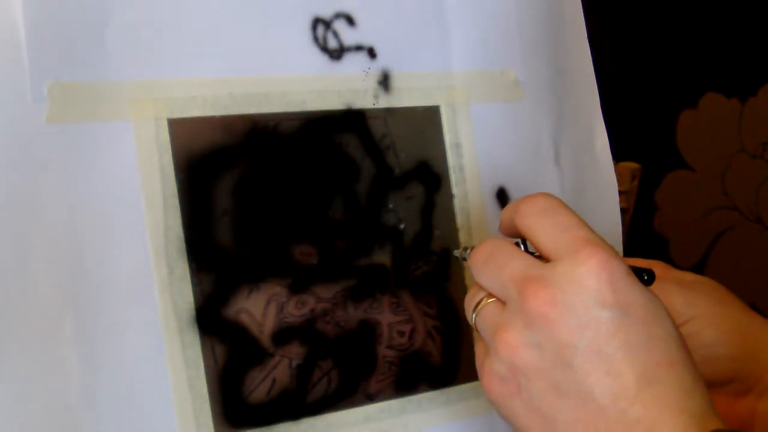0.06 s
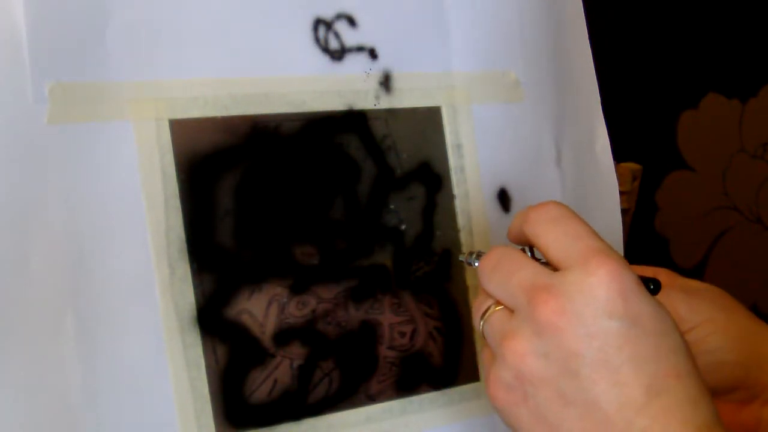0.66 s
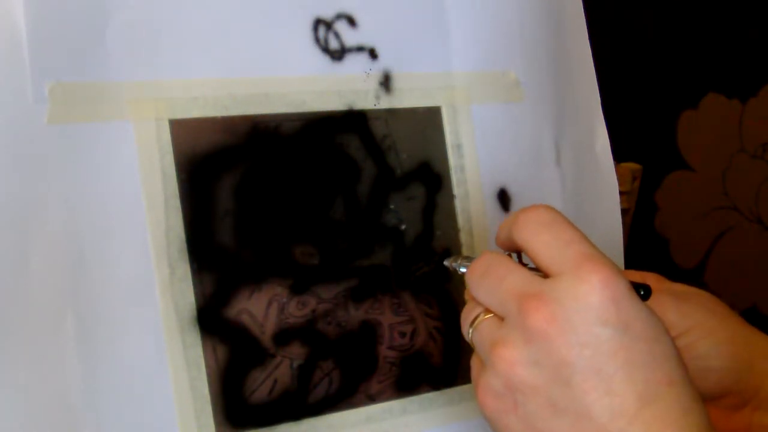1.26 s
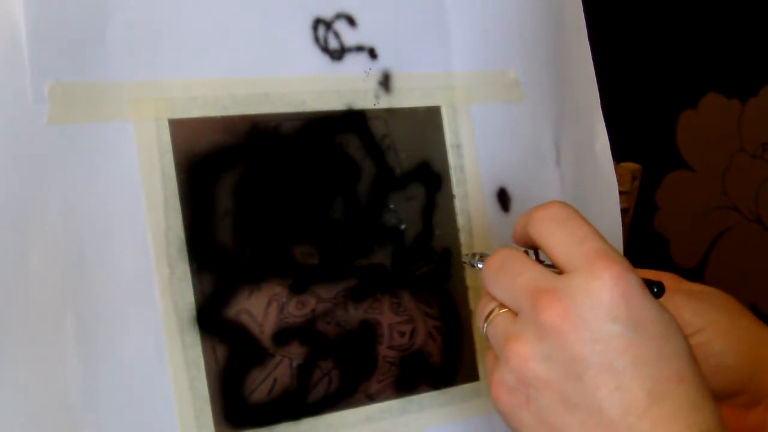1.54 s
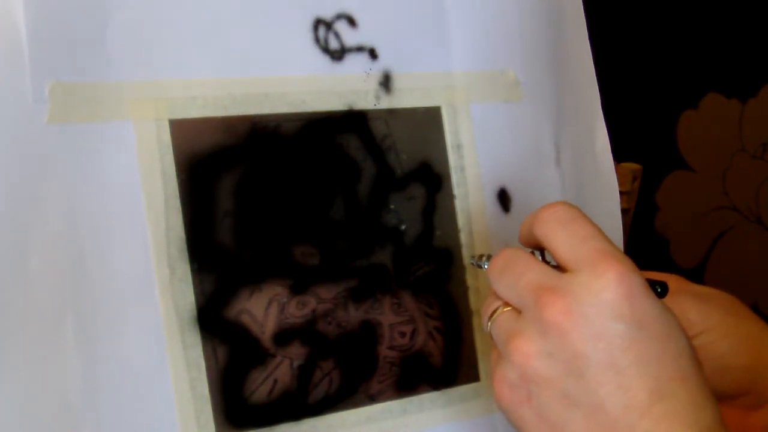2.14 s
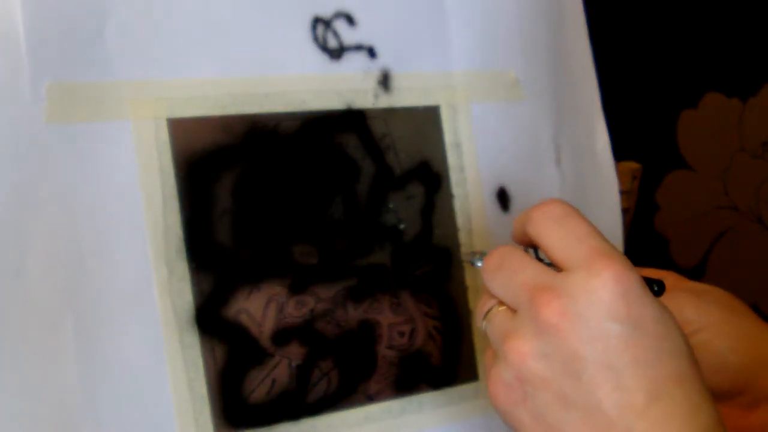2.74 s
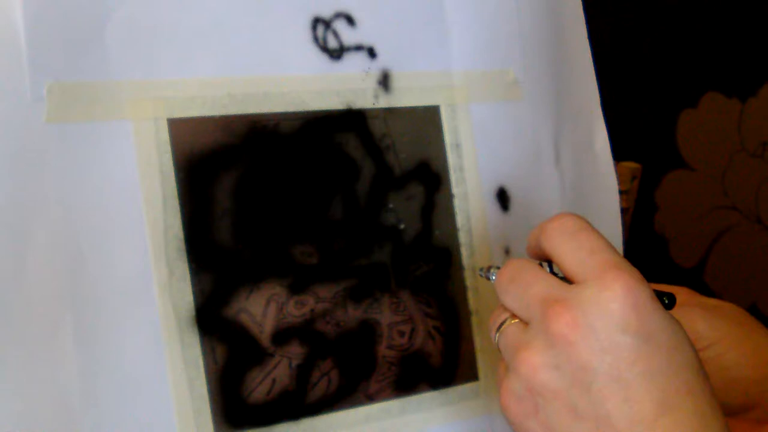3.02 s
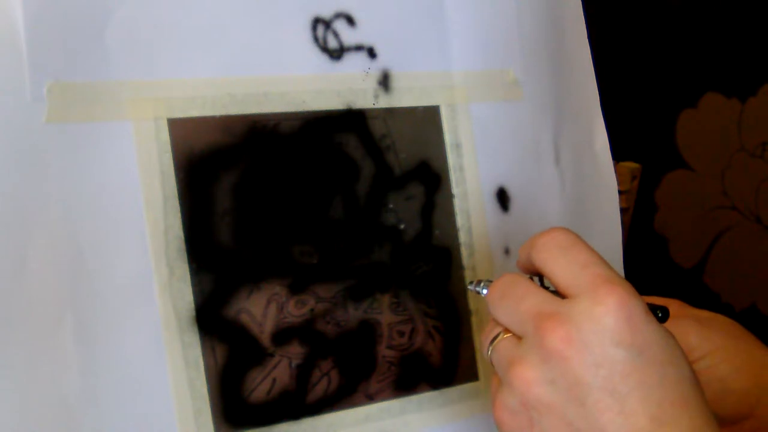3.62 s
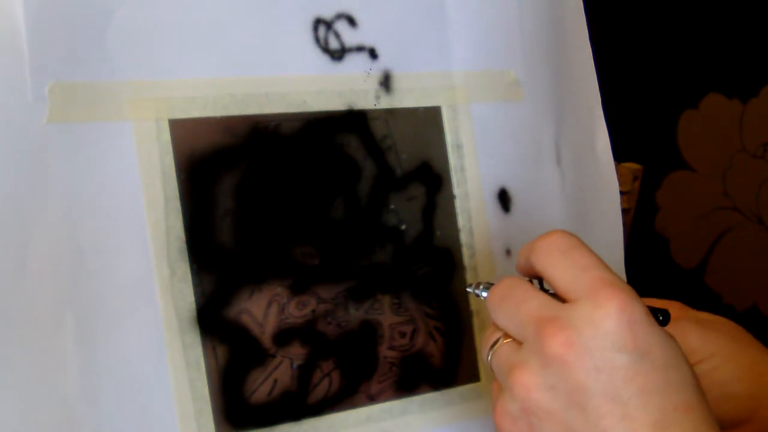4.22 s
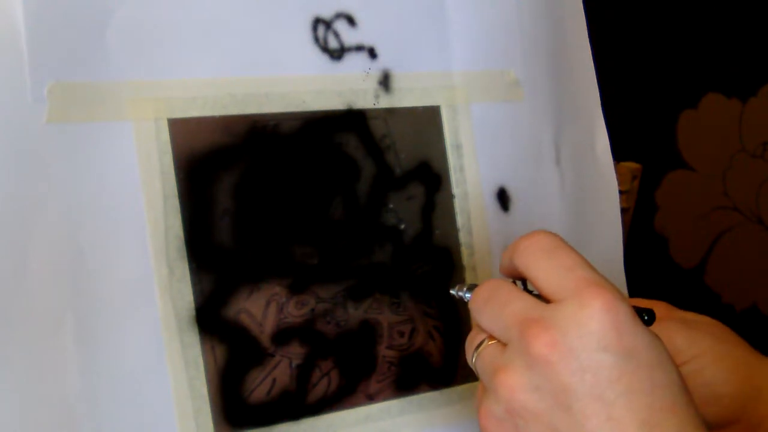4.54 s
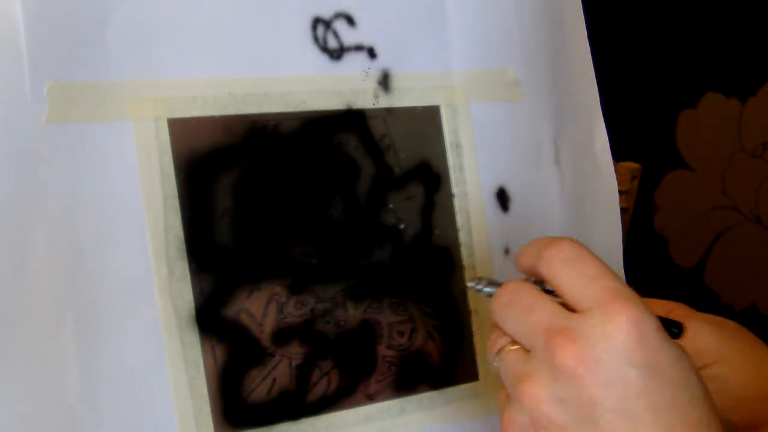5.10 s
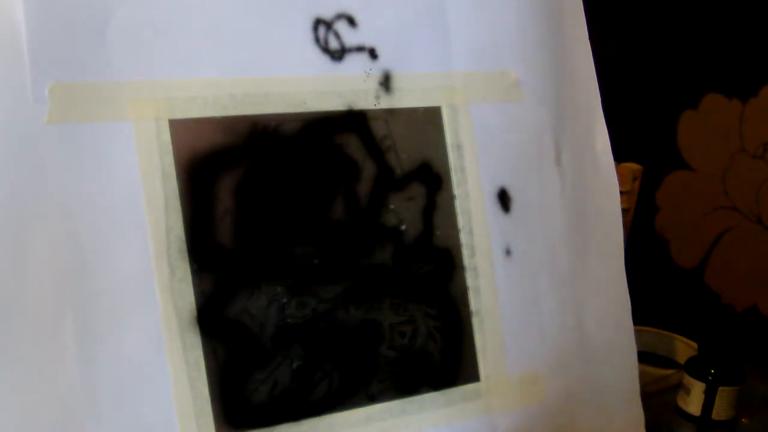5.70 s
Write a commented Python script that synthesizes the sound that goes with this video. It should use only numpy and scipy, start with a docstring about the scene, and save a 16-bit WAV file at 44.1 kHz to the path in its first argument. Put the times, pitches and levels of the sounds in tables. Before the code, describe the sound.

An airbrush hisses steadily over a faint chugging compressor, then cuts off with a sharp puff and a softer hiss of escaping air.

```python
"""An airbrush sprays paint at paper in a small room while a little piston compressor chugs behind it.
First a spray dies away, and trapped air escapes through the bleed valve with a thin whistle.
At 0.4 s the trigger opens and the jet hisses, throbbing slightly with each piston stroke.
The hiss changes colour as the hand moves down the sheet. Just after 5 s the trigger closes and
ticks softly, then the valve lets out a sharp puff and keeps hissing to the end."""
import sys
import numpy as np
from scipy import signal
from scipy.fft import rfft, irfft, next_fast_len
from scipy.io import wavfile
from scipy.ndimage import map_coordinates

SR = 44100
rng = np.random.default_rng(int(sys.argv[2]) if len(sys.argv) > 2 else 0)


def store_pcm(level_fs):
    """Save levels as 16-bit WAV."""
    pcm = np.round(np.clip(level_fs, -1, 1) * 32767).astype(np.int16)
    wavfile.write(sys.argv[1], SR, np.atleast_2d(pcm).T)


N = 254081

# the quiet room's noise: pitch_hz, relative_level_db
ROOM_SPECTRUM = [(25, 14.5), (65, 1.5), (140, -4.5), (200, 4), (330, -6.5), (650, 12), (900, -2),
                 (1200, 6.5), (2000, -0.5), (5000, -5.5), (7600, 2), (11000, -8), (15600, -7.5)]
# how long the room's echo takes to fade by 60 dB: pitch_hz, fade_s
ROOM_FADE = [(300, 0.18), (4000, 0.24), (15000, 0.24)]
# compressor speed, which sags against the closed air line: time_s, strokes_per_s
PISTON_SPEED = [(0, 22.85), (.35, 22.9), (.5, 22.93), (5.1, 22.927), (5.3, 22.8)]
# the notes the compressor's housing rings at: pitch_hz, width_hz, spraying_db, blocked_db
HOUSING_NOTES = [(466.8, 24, -59, -64.5), (557.9, 11.7, -51.5, -75), (597.6, 19.7, -72.5, -59),
                 (685.4, 8.3, -63.5, -58.5), (709.3, 5.7, -66.5, -94), (799.4, 7.8, -58.5, -62.5)]
# soft ticks of the trigger as it springs back: start_s, level_db, pitch_hz
TRIGGER_TICKS = [(5.084, -48, 3300), (5.13, -49, 7200), (5.175, -52.5, 7400)]
# when the bleed valve lets trapped air out: opens_s, closes_s, level_db, rise_s
VALVE_OPENINGS = [(0.13, .405, -42, 0.096), (5.209, 6, -43.5, 0.017)]
# the valve's broad rush: pitch_hz, relative_level_db
RUSH_SPECTRUM = [(100, -14), (1200, -10), (2100, -11), (3150, -2), (3500, -6), (5300, -3.5), (6300, 0),
                 (7700, 4), (9300, -1.5), (10500, -1), (12500, -2), (15600, 0)]
# the upper tones of the hollow inside the valve: pitch_hz, width_hz, relative_level_db
VALVE_HIGH_TONES = [(5160, 290, -1.5), (7800, 450, -8), (8660, 620, 4.5), (9450, 300, -1)]
# its lowest tone and a weaker band just below: pitch_hz, width_hz, relative_level_db
VALVE_LOW_TONE = [(4200, 760, 2), (3830, 260, -11)]
# that low tone sounds once enough air passes: air_level_db, tone_relative_to_air_db
LOW_TONE_STRENGTH = [(-48, -22), (-43.5, -10.5), (-41, -8), (-32, -6.5)]
# pulls of the trigger: opens_s, closes_s, level_db, fade_s
TRIGGER_PULLS = [(-1, .003, -33.5, 0.34), (0.392, 5.062, -31, 0.04)]
# the finger's pressure drifts during the long pull: time_s, flow_change_db
FINGER_DRIFT = [(.7, -.5), (1.2, 0.65), (1.9, 0.16), (3.1, -0.24), (3.55, .3), (4, -0.7), (5.05, 0.9)]
# the jet's hiss: pitch_hz, relative_level_db
JET_SPECTRUM = [(25, -15), (170, -15.5), (330, -16.5), (1000, -16), (2400, -16), (3800, -13.5),
                (5250, -8.5), (6150, -12), (7300, -4.5), (8600, -1), (9700, -3), (10800, -6.5),
                (12600, -7.5), (15600, -6.5)]
# the hand moves down the sheet: time_s, position (0 high, 1 low)
HAND_POSITION = [(2, .08), (3.4, 0.7), (4.7, 0.94)]
# bands that stand out with the nozzle high on the sheet: pitch_hz, width_hz, relative_level_db
UPPER_SHEET_BANDS = [(7280, 320, -3.5), (8900, 270, -1.5), (9400, 300, 2.5), (10070, 250, -2),
                     (14200, 900, -5.5)]
# and once it has moved down: pitch_hz, width_hz, relative_level_db
LOWER_SHEET_BANDS = [(7110, 740, -5.5), (8680, 420, 1), (9280, 220, 1.5), (15000, 870, -1.5)]
# the echo from the paper shifts as the hand moves: time_s, delay_ms
PAPER_DELAY = [(.8, 1.686), (1.3, 1.7), (2, 1.674), (2.6, 1.722), (3.2, 1.698), (3.9, 1.68), (4.5, 1.732),
               (5.05, 1.75)]

LOAD_RISE_S, LOAD_LAG_S, LOAD_FALL_S = .093, .048, .29  # the hose passes the trigger's effect on late
PRESSURE_DB, PRESSURE_S = -4, .14  # knocks start softer after a closing and grow as the line fills
LEAK = .11  # share of the flow that remains with the nozzle shut
PUFF_S, PUFF_DB = 5.229, -32.5  # the valve opens suddenly and dumps the trapped air
WHISTLE_S, WHISTLE_DB = .142, -48.5  # opening slowly, it whistles through the first gap
SNAP_S, SNAP_DB, EASE_S = .012, -3, .079  # the nozzle snaps part open, then eases to full flow
TOP_HZ = 15780


def amp(db):
    """Turn decibels into a volume multiplier."""
    return 10 ** (np.asarray(db) / 20)


def unit(x):
    """Scale a sound to an average (rms) level of 1."""
    return x / np.sqrt(np.mean(x ** 2) + 1e-20)


def along(points, hz):
    """Read between (pitch_hz, value) rows on a log pitch scale."""
    pitches, values = np.transpose(points)
    return np.interp(np.log(hz + 1), np.log(pitches), values)


def curve(rows):
    """Join (time_s, value) rows into one value per sample."""
    return np.interp(np.arange(N) / SR, *np.transpose(rows))


def wobble(rate):
    """A smooth curve through rate random points a second."""
    points = rng.standard_normal(int(N * rate / SR) + 4)
    return map_coordinates(points, [np.arange(N) * rate / SR])


def envelope(start, end, rise_s, fall_s):
    """Rise from start, hold until end, then fade by 60 dB every fall_s."""
    t = np.arange(N) / SR
    rise = np.clip((t - start) / rise_s, 0, 1)
    return rise * np.exp(-np.log(1000) * np.maximum(t - end, 0) / fall_s)


def burst(start, rise_s, hold_s, fall_s):
    """The loudness shape of one short event."""
    return envelope(start, start + rise_s + hold_s, rise_s, fall_s)


def settling(start, lag_s):
    """Stay at 1 until start, then sink towards 0."""
    return np.exp(-np.maximum(np.arange(N) / SR - start, 0) / lag_s)


def filtered(x, response):
    """Multiply each frequency in a sound by response(hz)."""
    size = next_fast_len(N + SR // 2)
    return irfft(rfft(x, size) * response(np.fft.rfftfreq(size, 1 / SR)), size)[:N]


def resonate(x, notes):
    """Make a sound ring at each (pitch_hz, width_hz, level_db) note."""
    return filtered(x, lambda hz: sum(
        amp(db) * 1j * hz * width / (pitch ** 2 - hz ** 2 + 1j * hz * width)
        for pitch, width, db in notes))


def coloured(x, spectrum):
    """Shape a sound's lows and highs, then scale it to level 1."""
    return unit(filtered(x, lambda hz: amp(along(spectrum, hz))))


def narrow_noise(bands):
    """Noise in (pitch_hz, width_hz, level_db) bands, scaled to level 1."""
    gain = lambda hz: sum(amp(db) / (1 + (2 * (hz - pitch) / width) ** 2) for pitch, width, db in bands)
    return unit(filtered(rng.standard_normal(N), gain))


def room_noise():
    """The steady, soft noise of the room."""
    return coloured(rng.standard_normal(N), ROOM_SPECTRUM)


def room_echo(x):
    """The room adds a short tail, in which the highs last a little longer than the lows."""
    hz, t, noise = signal.stft(rng.standard_normal(SR // 2), SR, nperseg=256)
    fade = amp(-60 * t / along(ROOM_FADE, hz)[:, None])
    tail = signal.istft(noise * fade, SR, nperseg=256)[1]
    return signal.fftconvolve(x, tail / np.linalg.norm(tail))[:N]


def line_load():
    """The share of air that flows freely, and the pressure that builds after each closing."""
    t = np.arange(N) / SR
    drawn = sum(envelope(opens, closes + LOAD_LAG_S, LOAD_RISE_S, LOAD_FALL_S)
                for opens, closes, _, _ in TRIGGER_PULLS)
    unfilled = sum((t > closes) * settling(closes + LOAD_LAG_S, PRESSURE_S)
                   for _, closes, _, _ in TRIGGER_PULLS)
    return np.clip(drawn, LEAK, 1), amp(PRESSURE_DB * unfilled)


def compressor(turns):
    """Each piston stroke knocks the housing, whose close notes beat into a quick rattle."""
    strokes = np.flatnonzero(np.diff(np.floor(turns)))
    knocks = np.zeros(N)
    knocks[strokes] = amp(rng.normal(0, .43, len(strokes))) * N / len(strokes) / np.sqrt(2)
    flowing, pressure = line_load()
    spraying_notes = [(hz, width, db) for hz, width, db, _ in HOUSING_NOTES]
    blocked_notes = [(hz, width, db) for hz, width, _, db in HOUSING_NOTES]
    spraying = resonate(knocks * flowing, spraying_notes)
    blocked = resonate(knocks * (1 - flowing) * pressure, blocked_notes)
    # trapped air cushions the knock, spreading it over a few milliseconds
    cushion = lambda hz: (1 - 1j * (hz - 650) / 200) / (1 + 1j * (hz - 650) / 200)
    # the small shell gives off only middle pitches
    shell = lambda hz: (hz / 390) ** 8 / (1 + (hz / 390) ** 8) / (1 + (hz / 900) ** 14)
    return filtered(spraying + filtered(blocked, cushion), shell)


def trigger_ticks(fade_s):
    """The metal lever springs back with brief, dull ticks."""
    t = np.arange(N) / SR
    return sum((t >= start) * amp(db - 60 * np.abs(t - start) / fade_s) * narrow_noise([(hz, hz / 2, 0)])
               for start, db, hz in TRIGGER_TICKS)


def bleed_valve():
    """Escaping air rushes, and the harder it blows, the more the valve's hollow sings."""
    steady = sum(amp(db) * envelope(opens, closes, rise_s, fall_s=.08)
                 for opens, closes, db, rise_s in VALVE_OPENINGS)
    puff = amp(PUFF_DB) * burst(PUFF_S, rise_s=.014, hold_s=.04, fall_s=.38)
    air_db = 10 * np.log10(steady ** 2 + puff ** 2 + 1e-12)
    rush = coloured(rng.standard_normal(N), RUSH_SPECTRUM)
    tone_share = np.interp(air_db, [-47.5, -43.5, -32.5], [.03, .22, .52])
    blow = np.sqrt(1 - tone_share) * rush + np.sqrt(tone_share) * narrow_noise(VALVE_HIGH_TONES)
    low_tone_db = np.interp(air_db, *np.transpose(LOW_TONE_STRENGTH))
    low_tone = amp(low_tone_db) * narrow_noise(VALVE_LOW_TONE)
    whistle_shape = burst(WHISTLE_S, rise_s=.011, hold_s=.022, fall_s=.08)
    whistle = amp(WHISTLE_DB) * whistle_shape * narrow_noise([(8050, 880, 0)])
    return amp(air_db + .71 * wobble(30)) * (blow + low_tone) + whistle


def nozzle_flow():
    """Each pull snaps the air on, eases up to full flow, holds and shuts."""
    pulls = sum(amp(db + SNAP_DB * settling(opens, EASE_S)) * envelope(opens, closes, SNAP_S, fade_s)
                for opens, closes, db, fade_s in TRIGGER_PULLS)
    return pulls * amp(curve(FINGER_DRIFT))


def turbulence(spits_per_s, spit_size):
    """Swirling air makes an even rush, and droplets add tiny clicks."""
    spits = (rng.random(N) < spits_per_s / SR) * rng.uniform(-1.23, 1, N)
    return rng.standard_normal(N) + spit_size * spits


def off_paper(x, echo_gain):
    """The sheet throws the jet's highs back, colouring the hiss as the hand moves."""
    delay_samples = curve(PAPER_DELAY) * SR / 1000
    highs = resonate(x, [(11000, 8000, 0)])
    echo = map_coordinates(highs, [np.arange(N) - delay_samples])
    return unit(x + echo_gain * echo)


def airbrush(turns):
    """The jet hisses, swells with each piston stroke and spits fine droplets."""
    hiss = coloured(turbulence(spits_per_s=120, spit_size=6), JET_SPECTRUM)
    lowered = np.clip(curve(HAND_POSITION), 0, 1)
    upper_sheet = np.sqrt(1 - lowered) * amp(-8.5) * narrow_noise(UPPER_SHEET_BANDS)
    lower_sheet = np.sqrt(lowered) * amp(-4) * narrow_noise(LOWER_SHEET_BANDS)
    jet = off_paper(hiss + upper_sheet + lower_sheet, echo_gain=.15)
    stroke_angle = 2 * np.pi * turns
    throb_db = .71 * np.cos(stroke_angle + .58) + .36 * np.cos(2 * stroke_angle + 2.2)
    flicker_db = .19 * wobble(12) + .63 * wobble(300)
    return jet * nozzle_flow() * amp(throb_db + flicker_db)


def scene():
    """Nozzle, valve and compressor share one air line and one room; left and right are the same."""
    turns = np.cumsum(curve(PISTON_SPEED)) / SR - .22  # running count of piston strokes
    near = airbrush(turns) + bleed_valve() + trigger_ticks(fade_s=.04)
    background = amp(-57) * room_noise()
    mono = near + amp(-13) * room_echo(near) + compressor(turns) + background
    return np.array([mono, mono])


def record(dry):
    """Cut away everything higher than TOP_HZ."""
    return np.array([filtered(channel, lambda hz: hz < TOP_HZ) for channel in dry])


dry = scene()
out = record(dry)
store_pcm(out)
```